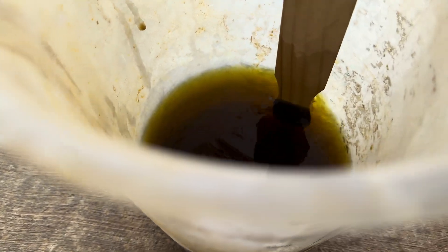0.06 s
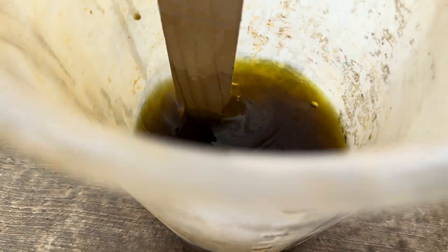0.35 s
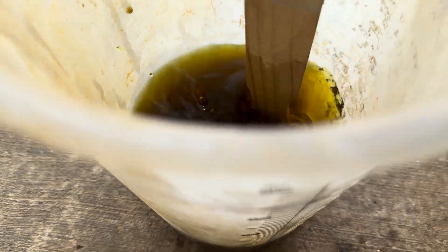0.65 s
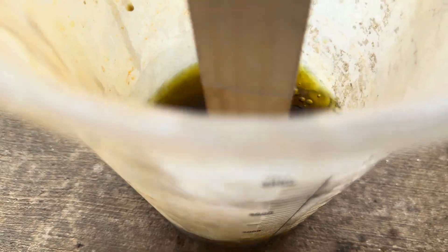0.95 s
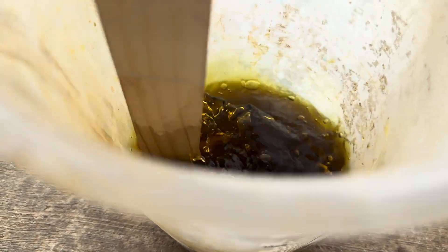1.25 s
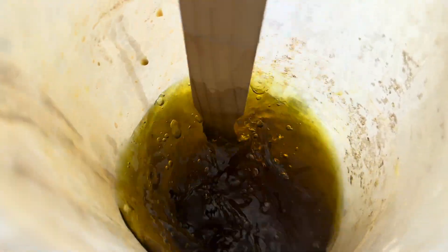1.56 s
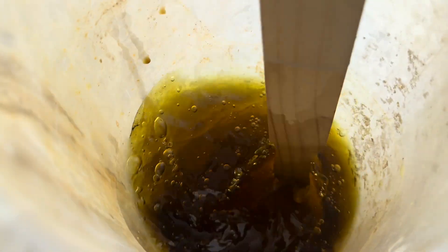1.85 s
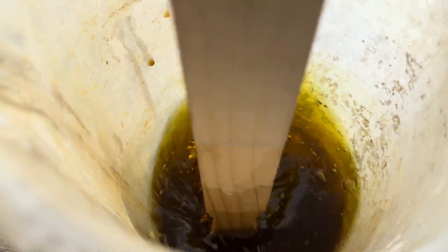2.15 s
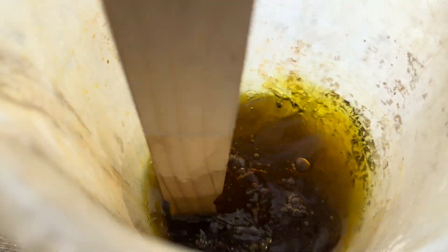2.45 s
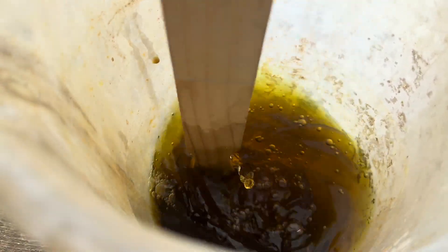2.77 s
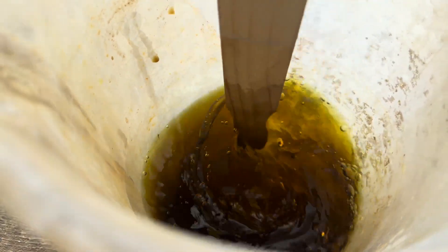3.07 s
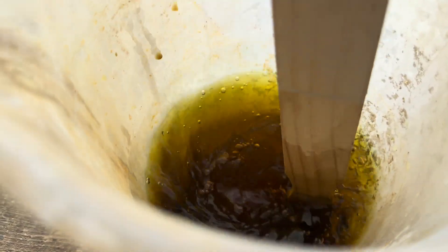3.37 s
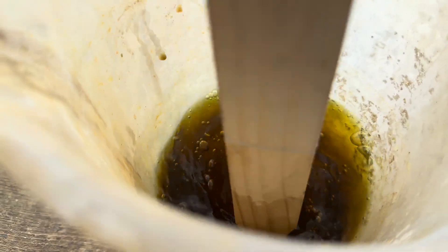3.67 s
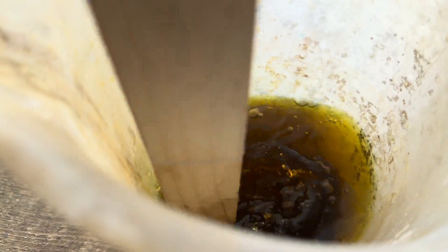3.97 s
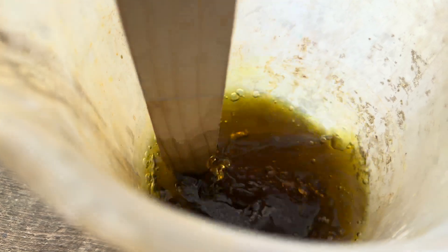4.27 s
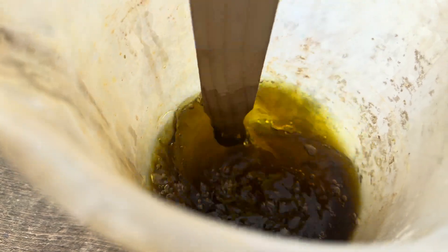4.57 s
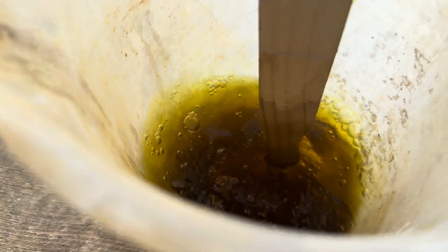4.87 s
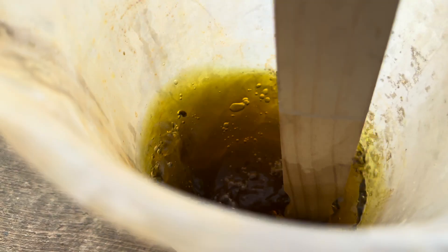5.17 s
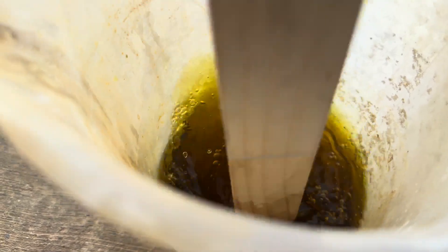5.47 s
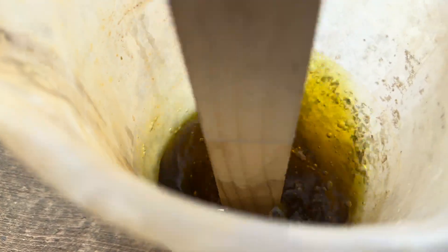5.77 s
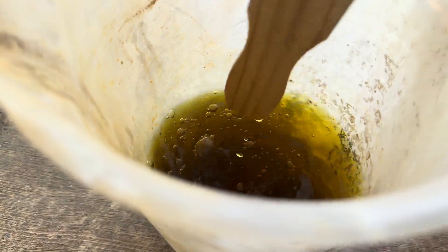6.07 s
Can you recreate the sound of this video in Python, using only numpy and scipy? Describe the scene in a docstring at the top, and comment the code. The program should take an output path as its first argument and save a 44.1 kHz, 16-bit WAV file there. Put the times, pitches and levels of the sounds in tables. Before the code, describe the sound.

A wooden stick stirs thick liquid in a plastic pitcher, heard close at the rim. About three times a second it bumps the wall with a hollow knock and rubs along the wet plastic. The liquid sloshes, plops and crackles with small bubbles. One sharp tap stands out near the start, with a few lighter ones later. The stirring stops just before six seconds, over a faint low rumble.

```python
"""At the rim of a plastic pitcher, a wooden paddle is heard stirring a thick liquid.
About three times a second it bumps the wall, exciting the air column, then rubs along the wet plastic.
Its wake traps bubbles that ring and burst; films snap, waves fold over, and a few times the wood
taps the wall sharply. A low rumble and a faint hush lie underneath."""
import sys
import numpy as np
from scipy import signal
from scipy.fft import rfft, irfft, next_fast_len
from scipy.io import wavfile
from scipy.ndimage import uniform_filter1d, map_coordinates

SR = 44100
rng = np.random.default_rng(int(sys.argv[2]) if len(sys.argv) > 2 else 0)


def dump(signal):
    """Clip the signal to [-1, 1] and save it as 16-bit WAV at the path in sys.argv[1]."""
    limited = np.clip(np.atleast_2d(signal).T, -1, 1)
    pcm = np.round(limited * 32767).astype(np.int16)
    wavfile.write(sys.argv[1], SR, pcm)


N = 270333
TIME = np.arange(N) / SR
AGE = np.arange(SR // 4) / SR  # time since an event began [s]

# paddle sweeps: (start [s], length [s], rub [dB], churn [dB], time to turn [s], easing at turn [dB])
STROKES = [(-0.01, 0.058, -48.5, -48.5, 0.019, -1.5), (0.29, 0.3, -42, -43.5, 0.039, 2.5),
           (0.516, 0.22, -47, -42, 0.061, 18), (0.838, 0.22, -42, -38, 0.089, -3.5),
           (1.124, 0.08, -39, -39.5, 0.03, 13), (1.28, 0.26, -37.5, -37, 0.13, 16.5),
           (1.616, 0.27, -39.5, -41.5, .19, 13), (1.96, 0.28, -36, -39, 0.24, 13),
           (2.339, 0.12, -39, -60, 0.012, 9.5), (2.409, 0.24, -42, -43, 0.16, 9),
           (2.731, 0.27, -39, -43, 0.066, 4.5), (3.108, 0.072, -34, -35.5, 0.046, 16),
           (3.171, 0.27, -40, -44, 0.13, 4.5), (3.478, 0.011, -45.5, -50, .02, -3.5),
           (3.519, 0.26, -38.5, -39.5, 0.22, 10), (3.85, 0.29, -37.5, -37.5, 0.052, -4),
           (4.198, 0.31, -40, -37.5, 0.19, 7), (4.595, 0.26, -39, -38, 0.25, 0),
           (4.955, 0.31, -38, -38, 0.29, 12), (5.313, 0.24, -36, -36, 0.18, 6),
           (5.669, 0.18, -35.5, -49, 0.13, 33)]
# modes of the air above the liquid: (frequency [Hz], bandwidth [Hz], gain [dB])
AIR_MODES = [(377.3, 17, 7), (528, 57, -2.5), (747, 13, 4.5)]
# spectrum of a tearing film: (frequency [Hz], density [dB])
TEAR_SPECTRUM = [(800, -17.5), (2000, -9), (3200, -4.5), (4200, -4), (6000, -5), (9500, -4), (11500, -21),
                 (13500, -8.5), (16000, -9)]


def amp(db):
    """Decibels to amplitude ratio."""
    return 10 ** (np.asarray(db) / 20)


def unit(x):
    """Normalisation to rms 1."""
    return x / np.sqrt(np.mean(x ** 2) + 1e-20)


def along(points, hz):
    """Interpolation on a logarithmic frequency axis."""
    f, values = np.transpose(points)
    return np.interp(np.log(hz + 1), np.log(f + 1), values)


def wobble(rate, size=N):
    """Smooth random modulation with rate knots a second."""
    return map_coordinates(rng.standard_normal(int(size * rate / SR) + 4), [TIME[:size] * rate])


def filtered(x, response):
    """Linear filtering: the spectrum times a frequency response."""
    n = x.shape[-1]
    padded = next_fast_len(n + 8192)
    return irfft(rfft(x, padded) * response(np.fft.rfftfreq(padded, 1 / SR)), padded)[..., :n]


def resonances(modes, f):
    """Summed response of second-order resonators (centre [Hz], bandwidth [Hz], gain [dB])."""
    return sum(amp(db) * 1j * f * width / (hz * hz - f * f + 1j * f * width) for hz, width, db in modes)


def panned(db):
    """Channel gains for a level difference, left over right."""
    return unit(amp([[db / 2], [-db / 2]]))


def at_rim(pair, spectrum):
    """Partial coherence: two independent signals are coloured and mixed as heard at the rim, rms 1."""
    # likeness of the channels: (frequency [Hz], correlation [1])
    coherence = [(60, 0.077), (150, 0.16), (350, 0.94), (700, 0.2), (3000, -0.077), (9000, 0.019),
                 (13000, 0.78)]
    # the left microphone faces into the pitcher: (frequency [Hz], left over right [dB])
    lean = [(150, -1.5), (380, 5.5), (1300, 3.5), (2400, 0.5), (4400, 8), (6500, 16), (9000, 0.5),
            (15000, 0)]

    def mid_side(hz):
        angle = np.arccos(np.clip(along(coherence, hz), -1, 1)) / 2
        return amp(along(spectrum, hz)) * [np.cos(angle), np.sin(angle)]

    mid, side = filtered(pair, mid_side)
    stereo = np.array([mid + side, mid - side])
    return unit(filtered(stereo, lambda hz: amp(np.outer([.5, -.5], along(lean, hz)))))


def noise(spectrum, size):
    """Spectrally shaped stereo noise, rms 1."""
    return at_rim(rng.standard_normal((2, size)), spectrum)


def fade(t60, attack, t=AGE):
    """Exponential damping after a soft onset; times in seconds."""
    return np.exp(-np.log(1000) * t / t60) * (1 - np.exp(-t / attack))


def mode(hz, t60, attack, phase=0):
    """Free vibration of one damped mode."""
    return fade(t60, attack) * np.sin(2 * np.pi * hz * AGE + phase)


def shaped(sound, envelope):
    """A burst whose energy is set by its envelope alone."""
    return unit(sound * envelope) * np.sqrt(np.mean(envelope ** 2))


def add(track, s, sound):
    """Superposition of a sound on the track at time s."""
    part = track[:, max(0, round(s * SR)):][:, :sound.shape[-1]]
    part += sound[..., :part.shape[-1]]


def rumble(rumble_db=5, hum_db=-2, hum_hz=76.5):
    """Low-frequency noise and a hum that wavers by phase modulation."""
    # slow drift of the rumble: (time [s], level [dB])
    drift = [(0.0, -48.5), (0.29, -49.5), (0.62, -41.5), (1.1, -40.5), (1.74, -44.5), (3.2, -42),
             (5.98, -42), (6.13, -39)]
    # rumble: (frequency [Hz], density [dB])
    spectrum = [(22, -39), (33, -17), (45, -2), (80, 4.5), (144, -7), (183, -8.5), (249, -19.5), (295, -22),
                (330, -26), (430, -51), (730, -120)]
    level_db = np.interp(TIME, *np.transpose(drift))
    hum = unit(np.array([np.sin(2 * np.pi * hum_hz * TIME + 1.7 * wobble(3.6)) for _ in range(2)]))
    return amp(level_db) * (amp(rumble_db) * noise(spectrum, N) + amp(hum_db) * hum)


def room_air(air_db=-65):
    """Stationary broadband noise: a faint hush."""
    # quiet air around the pitcher: (frequency [Hz], density [dB])
    spectrum = [(300, -14), (700, -1.5), (1500, -3), (3000, -12), (8000, -30), (16000, -43)]
    return amp(air_db) * noise(spectrum, N)


def sweep(start, length, turn, ease_db, linger_db, settle_db_per_s):
    """Drive and relaxation: the paddle bites, sags, eases at the turn and lets go; the liquid lingers."""
    attack_s, half_turn_s = 0.012, 0.044
    sag_db_per_s, release_db_per_s = 13, 340
    t = np.maximum(TIME - start, 0)
    after = np.maximum(t - length, 0)
    turning = np.exp(-((t - turn) / half_turn_s) ** 2)
    push_db = -sag_db_per_s * t - ease_db * turning - release_db_per_s * after
    linger = amp(linger_db - settle_db_per_s * after) * (after > 0)
    return np.minimum(t / attack_s, 1) * np.maximum(amp(push_db), linger)


def rub_level():
    """Friction follows the paddle's pressure; the film fizzes on as it drains."""
    return sum(amp(db) * sweep(s, length, turn, ease_db, linger_db=-18.5, settle_db_per_s=154)
               for s, length, db, _, turn, ease_db in STROKES)


def churn_level(lag_s=0.0053, follows=0.62):
    """Inertia: the liquid lags the paddle, eases less at the turn and swirls on."""
    return sum(amp(db) * sweep(s + lag_s, length, turn, follows * ease_db, -16, settle_db_per_s=32.5)
               for s, length, _, db, turn, ease_db in STROKES)


def patchy(x, depth_db):
    """Spectral modulation in patches of about 700 Hz by 20 ms: the wet film keeps changing colour."""
    spectrogram = signal.stft(x, nperseg=256)[2]
    field = rng.standard_normal(spectrogram.shape[1:])
    field = uniform_filter1d(uniform_filter1d(field, size=4, axis=0), size=7, axis=1)
    return signal.istft(spectrogram * amp(depth_db * unit(field)), nperseg=256)[1][:, :N]


def rubbing(rub_db=-1, grit_db=1.0, chatter_db=2.0):
    """Sliding friction: wood grain rasps on the wet plastic."""
    # rasp: (frequency [Hz], density [dB])
    spectrum = [(1060, -40), (1800, -5.5), (2680, -7.5), (3140, -2), (3710, -7.5), (3990, -8), (4630, -8.5),
                (6120, -4.5), (7030, -16), (8160, -6.5), (9800, -6.5), (11400, -28.5), (12800, -9),
                (14900, -11.5), (16000, -10), (16500, -55)]
    grit = rng.standard_normal((2, N)) * amp(grit_db * wobble(1500) + chatter_db * wobble(70))
    return amp(rub_db) * rub_level() * at_rim(patchy(grit, depth_db=3), spectrum)


def bubble(hz, t60, rise, t):
    """Minnaert resonance: trapped air pulsates, its pitch gliding up if it nears the surface."""
    glide = .6 * np.tanh(rise * t / .6)  # levels off at the surface
    cycles = hz * np.cumsum(1 + glide) / SR
    right_lag_cycles = np.array([[0], [min(hz * rng.uniform(0.0001, 0.00032), .34)]])
    return fade(t60, 2.2 / hz, t) * np.sin(2 * np.pi * (cycles - right_lag_cycles))


def swarm(centre_hz, spread, life_cycles, rise, size_db, count):
    """Incoherent sum of small bubbles with random onsets and log-normal pitches, rms 1."""
    out = np.zeros((2, N))
    for when, size, pitch in zip(rng.random(count), rng.exponential(size=count),
                                 rng.standard_normal(count)):
        hz = np.clip(centre_hz * np.exp(spread * pitch), 500, 14000)
        t60 = life_cycles / hz
        ring = bubble(hz, t60, rise, AGE[:int(t60 * SR) + 2])
        add(out, when * N / SR, amp(size_db * min(size, 2)) * ring)
    return unit(out)


def churning(wash_db=-4.5, froth_db=-11, gurgle_db=-8, air_db=-7, calming_db_per_s=1.5):
    """Air entrainment: the churned surface washes, bubbles and keeps the air column murmuring."""
    # surface wash: (frequency [Hz], density [dB])
    spectrum = [(400, 3), (600, -2.5), (720, 4), (900, -7), (1130, 7.5), (1360, 9), (1600, -1.5), (1850, 5),
                (2300, -4), (3500, -21.5)]
    wash = amp(wash_db + 2.2 * wobble(35) + 3.5 * wobble(300)) * noise(spectrum, N)  # swells and grain
    froth = swarm(centre_hz=1558, spread=0.308, life_cycles=56, rise=8.8, size_db=12.5, count=900)
    gurgle = swarm(centre_hz=1377, spread=0.285, life_cycles=58, rise=12.6, size_db=6.5, count=170)
    bubbling = amp(froth_db) * panned(db=10.5) * froth + amp(gurgle_db) * panned(db=20) * gurgle
    drive = noise([(150, -8), (300, 7.5), (800, -13.0), (1500, -51.0)], N)
    murmur = amp(air_db) * unit(filtered(drive, lambda f: resonances(AIR_MODES, f)))
    calming = amp(-calming_db_per_s * TIME)  # liquid swirling with the paddle traps less air
    return churn_level() * (wash + murmur + calming * bubbling)


def spits(size_db, t60, count):
    """Shot noise of tiny films tearing at random times, rms 1."""
    sizes = amp(size_db * np.minimum(rng.exponential(size=count), 2))
    tears = np.bincount(rng.integers(0, N, count), sizes, N)
    return unit(signal.fftconvolve(tears, fade(t60, t60 / 12))[:N] * noise(TEAR_SPECTRUM, N))


def crackle(burst_db=-9, click_db=-12, pip_db=-13, tick_db=-10, cling_s=0.46, foam_limit_db=13):
    """Tiny bubbles resonate high as the paddle squeezes the film; clinging foam ticks between sweeps."""
    activity = np.sqrt(rub_level() * churn_level())
    smoothed = np.abs(uniform_filter1d(activity, int(cling_s * SR)))
    foam_level = np.minimum(smoothed, amp(foam_limit_db) * activity)
    bursts = swarm(centre_hz=5400, spread=0.25, life_cycles=85, rise=3, size_db=9, count=380)
    pips = swarm(centre_hz=3900, spread=0.28, life_cycles=32, rise=3.6, size_db=8.5, count=420)
    clicks = swarm(centre_hz=8600, spread=.2, life_cycles=50, rise=0, size_db=12, count=260)
    ticks = spits(size_db=9, t60=0.012, count=340)
    foam = amp(pip_db) * panned(db=3.5) * pips + amp(click_db) * clicks + amp(tick_db) * ticks
    return activity * amp(burst_db) * panned(db=8) * bursts + foam_level * foam


def wall_ring(attack, scatter_db=2):
    """Modal vibration of the wall, at new strengths for each blow."""
    # plastic wall: (frequency [Hz], level [dB], t60 [s])
    modes = [(161.4, -2.5, 0.11), (225, 5, 0.042), (306.4, 4.5, 0.069), (405, -19, 0.023), (532, 1.5, 0.02)]
    return sum(amp(db + scatter_db * rng.normal()) * mode(hz, t60, attack) for hz, db, t60 in modes)


def bumps(air_db=6, wall_db=2, knock_db=7, knock_hz=533, blur_rad=0.35):
    """Quarter-wave resonance: the submerged paddle knocks the wall and the air column takes the note."""
    # bumps, whose note the tilting surface shifts and damps: (time [s], level [dB], relative thud [dB],
    # relative knock [dB], relative edge [dB], air column frequency [Hz], its t60 [s])
    blows = [(0.044, -24.5, 5.5, -7, -4, 379, 0.17), (0.298, -23, -1.5, -13, -4, 375.5, 0.17),
             (0.854, -30, -1.5, -8.5, -10, 376, 0.21), (1.291, -31.5, -12, -13.5, 0, 370.4, 0.14),
             (1.623, -32, -13, -30, -17, 368, 0.12), (1.957, -20, -18, -26, -29, 372.2, 0.11),
             (2.411, -18.5, -28, -12, -5.5, 376.7, 0.15), (2.755, -23.5, -14, -11, -18, 376, 0.18),
             (3.174, -24.5, -12, -12, -15, 374.7, 0.16), (3.528, -18, -24, -10.5, -9.5, 376.5, 0.17),
             (3.887, -22, -7, -13, -29, 372, 0.15), (4.246, -23.5, -5.5, -13.5, -27, 371.6, 0.14),
             (4.988, -23, -13, -26, -7, 374.7, 0.14), (5.32, -27, -2.5, -30, -27, 365.6, 0.15),
             (5.681, -16.5, -22, -11.5, -9, 378.2, 0.16)]
    # scuff of the paddle's edge: (frequency [Hz], density [dB])
    edge_spectrum = [(120, -25), (300, -0.5), (550, 10), (760, 1), (900, -5.5), (1350, 3.5), (1850, -12),
                     (2600, -19), (8000, -54)]
    out = np.zeros((2, N))
    for s, db, thud_db, hard_db, edge_db, hz, t60 in blows:
        column = amp(air_db) * mode(hz, t60, attack=.0045)
        thud = amp(wall_db + thud_db) * wall_ring(attack=.002)
        slip = blur_rad * wobble(200, len(AGE))  # sliding contact blurs the knock's pitch
        knock = amp(knock_db + hard_db) * mode(knock_hz, t60=0.068, attack=0.00049, phase=slip)
        edge = amp(edge_db) * shaped(noise(edge_spectrum, len(AGE)), fade(t60=0.031, attack=0.0005))
        add(out, s, amp(db) * ((column - thud + knock) * panned(db=8) + edge))
    return out


def taps(clack_db=-2, scuff_db=-9, tail_db=-19, air_db=-6):
    """Impulsive excitation: hard contact gives a short clack, a wet scuff and a hollow ring."""
    # hard taps: (time [s], level [dB], relative hollow body [dB])
    strikes = [(0.2155, -23, -7), (0.5468, -1, -20.5), (0.56, -26.5, -2.5), (0.572, -24, -2.5),
               (0.7864, -19.5, -11.5), (1.001, -9, -20.5), (1.95, -24, -4.5), (2.057, -23.5, -15),
               (4.572, -20.5, -15.5)]
    # wood struck on plastic: (frequency [Hz], level [dB], t60 [s])
    clack_modes = [(540, -8.5, 0.027), (806, -11.5, 0.013), (1350, -5, 0.016), (1845, 3, 0.0068),
                   (2420, -10, 0.0021)]
    # wet scuff: (frequency [Hz], density [dB])
    scuff_spectrum = [(100, -8), (300, -13), (520, 4), (800, 5), (1100, -9), (1360, 5), (1550, -12),
                      (1850, -4.5), (2700, -21), (6500, -27.5), (15000, -40)]
    out = np.zeros((2, N))
    for s, db, hollow_db in strikes:
        clack = sum(amp(level + rng.normal()) * mode(hz, t60, attack=0.00095)
                    for hz, level, t60 in clack_modes)
        contact = amp(scuff_db) * fade(t60=0.026, attack=0.00021)
        tail = amp(tail_db) * fade(t60=0.15, attack=0.0012)
        scuff = shaped(noise(scuff_spectrum, len(AGE)), contact + tail)
        column = amp(air_db) * mode(AIR_MODES[0][0], t60=0.32, attack=0.0025)
        body = amp(hollow_db) * (wall_ring(attack=0.0079) + column)
        add(out, s, amp(db) * (amp(clack_db) * clack * panned(db=14) + scuff + body * panned(db=10.5)))
    return out


def plops(plop_db=-0.5, splash_db=-10.5, splash_octaves=0.43, quiver_db=3.0):
    """Bubble resonance in the wake: each starts with a splash, and moving liquid makes it quiver."""
    # trapped bubbles, and among the low rows near 650-850 Hz the air column ringing as a bubble is born: (time
    # [s], level [dB], frequency [Hz], t60 [s], relative pitch rise [1/s], # left over right [dB])
    bubbles = [(0.219, -15.5, 1240, 0.013, 15, 15), (0.245, -36, 1630, 0.047, 18, 5),
               (0.307, -26, 1910, 0.047, 6, 0), (0.322, -19.5, 1330, 0.019, 20, 14),
               (0.329, -19.5, 1654, 0.029, 14, 2), (0.406, -24, 767, 0.056, 13, 11),
               (0.427, -30, 1054, 0.098, 29, 8), (0.497, -18, 2300, 0.027, 7, 2),
               (0.52, -14.5, 5020, 0.019, 39, 20), (0.522, -20, 3850, 0.033, -3, 12),
               (0.556, -7.5, 6700, 0.0071, 8, 15), (0.65, -15.5, 5150, 0.016, -17, 20),
               (0.672, -26.5, 877, 0.085, 38, 5), (0.703, -25, 3960, 0.017, 5, 8),
               (0.742, -25, 4080, 0.01, 16, 18), (0.741, -27, 2230, 0.042, 2, 2),
               (0.856, -25, 2290, 0.033, 7, 7), (0.893, -30, 852, 0.059, 28, 10),
               (0.901, -15.5, 1470, 0.018, 16, 12), (0.942, -15, 3215, 0.019, -7, 13),
               (0.957, -24, 1330, 0.04, -6, 17), (0.995, -15.5, 1110, 0.051, 22, -2),
               (1.017, -14, 1180, 0.026, 18, 7), (1.056, -28, 990, 0.035, 22, 5),
               (1.143, -15.5, 1626, 0.04, -1.5, 14), (1.184, -27, 1860, 0.16, 7, 3),
               (1.218, -25.5, 1513, 0.092, -4.5, 7), (1.227, -32, 2640, 0.06, -1, 0),
               (1.247, -29, 1430, 0.12, 6.5, 7), (1.341, -22, 3100, 0.017, -7, 17),
               (1.32, -16, 1225, 0.036, 13.5, 8), (1.323, -22, 740, 0.054, -1, 4),
               (1.322, -14, 3170, 0.013, 6, 25), (1.382, -21, 1043, 0.047, -3, 8),
               (1.461, -17.5, 796, 0.019, 20, 11), (1.464, -15.5, 1280, 0.047, 5, -1),
               (1.492, -11, 2995, 0.03, 0, -1), (1.492, -15.5, 5300, 0.017, 59, 14),
               (1.527, -22, 4090, 0.022, 2, 18), (1.526, -18.5, 640, 0.019, -12, 5),
               (1.579, -32, 950, 0.082, 8, 11), (1.681, -26, 5700, 0.0097, 8, 10),
               (1.72, -0.5, 1180, 0.0048, 26, 12), (1.752, -16.5, 1334, 0.067, 34.5, 11),
               (1.752, -15, 845, 0.024, -4, 9), (1.848, -27, 5640, 0.017, 2, 14),
               (1.881, -29.5, 3030, 0.031, 0, 16), (1.964, -20, 1334, 0.054, 6.5, 9),
               (1.984, -3.5, 2890, 0.028, 15.5, 2.5), (2.028, -26, 4600, .014, 4, 18),
               (2.043, -25.5, 1964, 0.043, -5.5, 16), (2.06, -26.5, 654, 0.097, -2, 7),
               (2.068, -27, 1304, 0.041, -1.5, 18), (2.101, -26.5, 1310, 0.063, 3.5, 16),
               (2.132, -13.5, 904, 0.02, 0, 15), (2.261, -24, 5100, 0.015, 11, 12),
               (2.289, -20, 5000, 0.011, -11, -2), (2.351, -28.5, 3570, 0.042, 15, 0),
               (2.388, -26, 2940, .018, 3, 6), (2.441, -22.5, 1580, 0.045, 12, 2),
               (2.459, -23.5, 1130, 0.023, 13, 5), (2.485, -32, 1295, 0.08, 4.5, 10),
               (2.504, -16.5, 2350, 0.019, 0, 0), (2.672, -31, 1020, 0.026, 10, 6),
               (2.934, -30, 1050, 0.031, 18, 3), (2.957, -31.5, 610, 0.037, 6, 2),
               (3.061, -19, 6150, 0.023, -11, 15), (3.063, -34.5, 4480, 0.069, -19, 3),
               (3.066, -26.5, 1440, 0.068, 1, 5), (3.101, -24, 2780, 0.014, 2, 7),
               (3.119, -8.5, 1760, 0.015, 18, 5), (3.161, -23, 1390, 0.028, 4, 9),
               (3.16, -24, 4200, 0.017, 3, 4), (3.248, -17, 1295, 0.026, -3, 9),
               (3.309, -16.5, 3200, 0.012, 5, 14), (3.308, -18, 1062, 0.05, -6, 6),
               (3.491, -23, 1650, 0.03, 17, -3), (3.509, -24, 5770, .013, 6, 20),
               (3.535, -19, 1760, 0.019, 4, 1), (3.633, -25, 1870, 0.046, 6, 2),
               (3.76, -11.5, 2510, 0.013, 3, -3), (3.762, -15, 3100, 0.023, 30, 9),
               (3.873, -2.5, 1450, 0.012, -3, 2), (3.896, -19, 1220, 0.028, 10, 3),
               (3.93, -21.5, 733, 0.03, 12, 4), (3.989, -19.5, 1220, 0.043, 9, 8),
               (4.023, -25.5, 2250, 0.077, 0.5, -1), (4.023, -24, 2930, 0.02, -1, 5),
               (4.064, -21, 3890, 0.017, 19, 8), (4.065, -20, 5540, 0.016, 6, 20),
               (4.082, -27, 1196, 0.044, 3, 3), (4.104, -25.5, 1180, 0.031, 4.5, 10),
               (4.128, -26, 1150, 0.032, 4, 4), (4.2315, -8.5, 3050, 0.0094, -2, 22),
               (4.233, -2, 1330, 0.016, -11, 3), (4.232, -16.5, 714, 0.033, 8.5, 8),
               (4.24, -4.5, 1360, 0.028, 24, 14), (4.2505, -7, 1790, 0.017, 18, -2),
               (4.42, -27, 1700, 0.041, 8, 5), (4.437, -17.5, 5640, 0.024, 28, 12),
               (4.438, -10.5, 1648, 0.028, 17, 5), (4.558, -23.5, 1520, 0.024, 9, 10),
               (4.577, -15.5, 5100, 0.016, 30, 11), (4.582, -18, 3360, 0.017, -7, 6),
               (4.612, -24, 2720, .018, 2, 5), (4.615, -6, 870, 0.009, 51, 6),
               (4.619, -16.5, 1010, 0.032, 14, 4), (4.628, -21, 2960, 0.013, 6, 0),
               (4.631, -13.5, 1504, 0.024, 18, 4), (4.671, -22, 1353, 0.051, 0.5, 4),
               (4.967, -24.5, 1340, 0.069, 5, 19), (4.975, -14, 3620, 0.015, 3, 4),
               (4.998, -3, 1220, 0.0055, 5, 6), (5.0625, -9.5, 1144, 0.031, 23, 6),
               (5.063, -19, 676, 0.028, 4, 5), (5.064, -22, 1780, 0.039, 2, 4),
               (5.11, -20, 5860, 0.015, 8, 15), (5.146, -21, 1160, 0.032, 2, 16),
               (5.182, -32, 1360, 0.031, -1, 8), (5.273, -27, 1670, 0.023, 11, 9),
               (5.332, -20, 2780, 0.015, 9, -2), (5.354, -23, 6520, 0.013, 6, 20),
               (5.398, -17, 9500, 0.0091, 7, 3), (5.641, -30.5, 1050, 0.061, 5, 7),
               (5.657, -33, 1740, 0.03, 10, 0), (5.68, -20.5, 1254, 0.033, 7, 3),
               (5.699, -25.5, 1336, 0.047, 0.5, 7), (5.7255, -10.5, 1138, 0.054, 9.5, 2),
               (5.782, -35, 1850, 0.093, -3, 3)]
    out, t = np.zeros((2, N)), AGE[:SR // 14]
    for s, db, hz, t60, rise, pan_db in bubbles:
        quiver = amp(quiver_db * np.tanh(wobble(640, len(t))))
        band = lambda f: np.exp(-(np.log2((f + 1) / hz) / splash_octaves) ** 2 / 2)
        hiss = filtered(rng.standard_normal((2, len(t))), band)
        splash = amp(splash_db) * shaped(hiss, fade(0.98 * t60, 2 / hz, t))
        add(out, s, amp(db + plop_db) * panned(pan_db) * (quiver * bubble(hz, t60, rise, t) + splash))
    return out


def snaps(spit_db=-1.5, fizz_db=3, ragged_db=4):
    """Film rupture: liquid tears between wood and wall with a short, ragged spit."""
    # tearing films: (time [s], level [dB], relative fizz [dB])
    ruptures = [(0.321, -23.5, -14), (0.516, -18, -8.5), (0.544, -15.5, -14), (0.558, -22, -29),
                (0.9432, -17.5, -25), (1.133, -28, -22), (1.162, -28, -26), (1.218, -20.5, -44),
                (1.271, -34, -12), (1.4936, -17, -29.5), (1.6805, -14.5, -6), (1.976, -21.5, -19),
                (1.982, -9.5, -22), (1.999, -10, -9), (2.346, -25, -11), (2.352, -21, -16),
                (2.363, -25.5, -8), (2.7347, -18, -7), (3.104, -31, -7), (3.1189, -20.5, -20.5),
                (3.236, -20.5, -31.5), (3.7596, -25, -8), (3.8703, -19, -15), (4.063, -19, -38),
                (4.2306, -10.5, -3), (4.439, -25, -25), (4.578, -24, -11), (4.987, -18.5, -3),
                (5.143, -20.5, -18), (5.335, -22, -11), (5.3535, -11.5, -13), (5.998, -42.5, -26),
                (6.092, -38, -23)]
    # treble fizz: (frequency [Hz], density [dB])
    fizz_spectrum = [(8000, -9), (11500, -13), (13500, 0), (15300, 6), (16300, -24)]
    out, t = np.zeros((2, N)), AGE[:SR // 20]
    body, fizz = noise(TEAR_SPECTRUM, N + len(t)), noise(fizz_spectrum, N + len(t))
    envelope = fade(t60=.015, attack=.0005, t=t)
    for s, db, top_db in ruptures:
        now = slice(round(s * SR), round(s * SR) + len(t))
        spit = body[:, now] + amp(fizz_db + top_db) * fizz[:, now]
        tear = unit(amp(ragged_db * wobble(1180, len(t))))
        add(out, s, amp(db + spit_db) * panned(db=-1.5) * shaped(tear * spit, envelope))
    return out


def sloshes(lumps_db=5):
    """Wave breaking: the liquid folds over against the wall and runs out in lumps."""
    # folding waves: (time [s], level [dB], t60 [s])
    waves = [(0.549, -25.5, 0.081), (0.885, -24.5, 0.11), (1.004, -24, 0.16), (1.222, -44, 0.077),
             (2.065, -38.5, 0.19), (2.445, -41, 0.071), (3.245, -43, 0.06), (4.235, -27, 0.15),
             (4.425, -39, 0.08), (4.614, -34, 0.11), (4.995, -33, 0.06)]
    # one slosh: (frequency [Hz], density [dB])
    spectrum = [(200, -13), (500, -9), (800, 6), (1250, 10), (1700, -12), (2500, -17), (5000, -55)]
    out = np.zeros((2, N))
    for s, db, t60 in waves:
        lumpy = noise(spectrum, len(AGE)) * amp(lumps_db * wobble(259, len(AGE)))
        add(out, s, amp(db) * shaped(lumpy, fade(t60, attack=0.0049)))
    return out


def pitcher_echo(x, wet_db=-13, cross_db=-6):
    """Reverberation: sound bounces briefly between the walls and excites transverse standing waves."""
    # air across the pitcher: (frequency [Hz], bandwidth [Hz], gain [dB])
    cross_modes = [(1394, 88, -3.5), (1835, 24, 4.5), (2950, 75, -17)]
    tail = rng.standard_normal((2, len(AGE))) * fade(t60=.05, attack=.0008)
    echo = signal.fftconvolve(x, tail / np.linalg.norm(tail[0]), axes=1)[:, :N]
    ring = filtered(x.mean(axis=0), lambda f: resonances(cross_modes, f))
    return x + amp(cross_db) * panned(db=6) * ring + amp(wet_db) * echo


def rim_notch(x):
    """Destructive interference: wall reflections weaken one band at the rim."""
    # cancelling echo: (frequency [Hz], bandwidth [Hz], gain [dB])
    reflection = [(2195, 255, -11)]
    return filtered(x, lambda hz: 1 - resonances(reflection, hz))


def scene():
    """Superposition of the paddle's blows, the sounds from deep in the pitcher and the background."""
    deep = pitcher_echo(plops() + snaps() + crackle()) + churning() + sloshes() + rubbing()
    return bumps() + taps() + rim_notch(deep) + rumble() + room_air()


def record(dry, ceiling=.95, top_hz=16000):
    """Soft saturation rounds the hardest tap; a low-pass limits the band."""
    rounded = dry / (1 + np.abs(dry / ceiling) ** 6) ** (1 / 6)
    return filtered(rounded, lambda hz: hz < top_hz)


dry = scene()
out = record(dry)
dump(out)
```